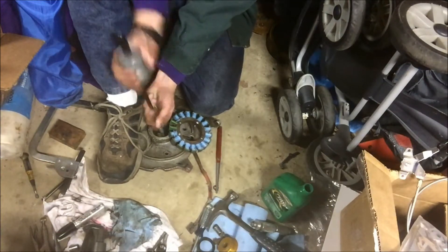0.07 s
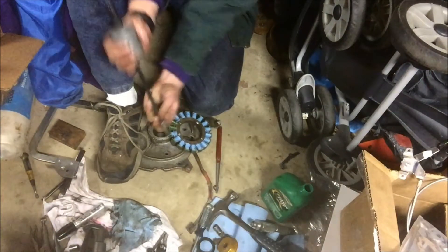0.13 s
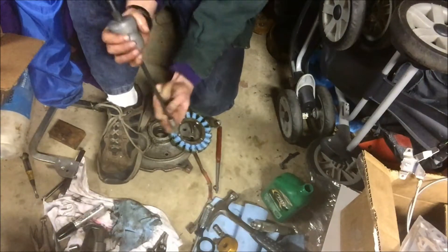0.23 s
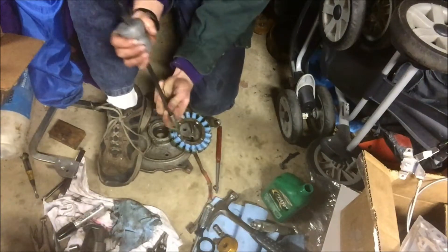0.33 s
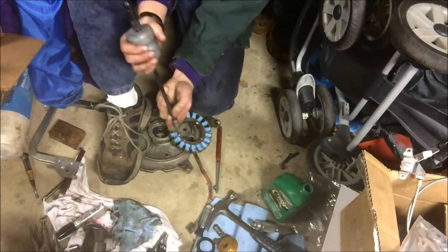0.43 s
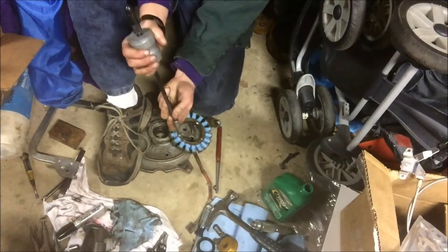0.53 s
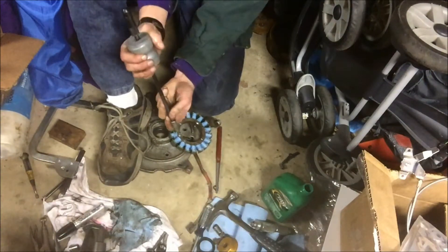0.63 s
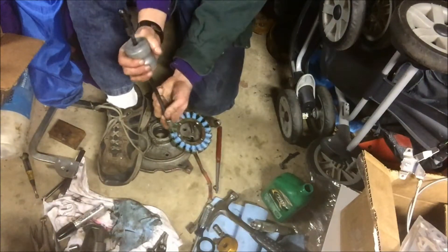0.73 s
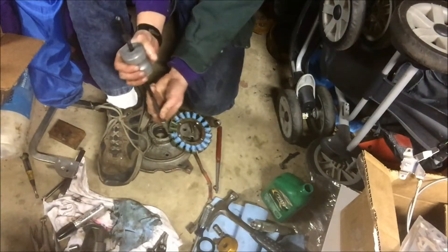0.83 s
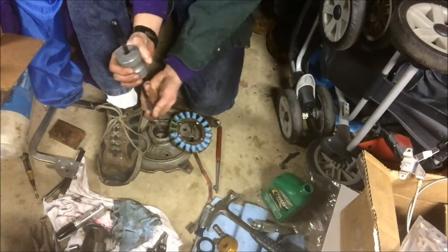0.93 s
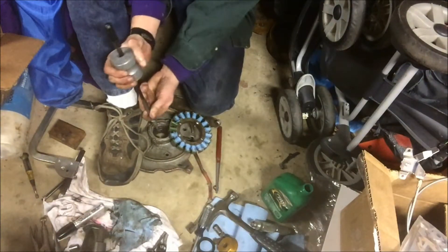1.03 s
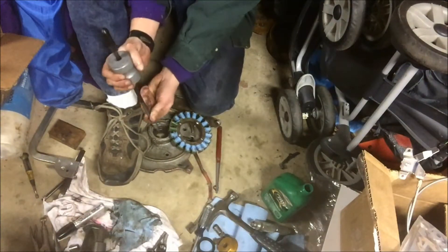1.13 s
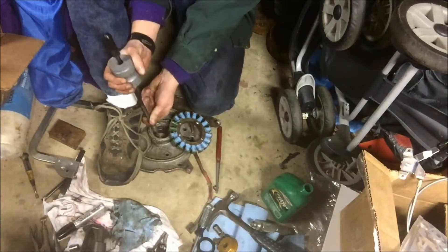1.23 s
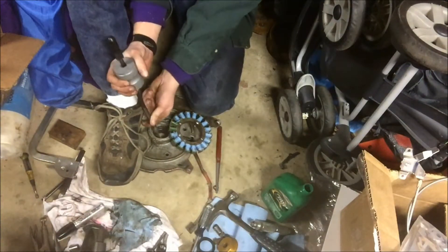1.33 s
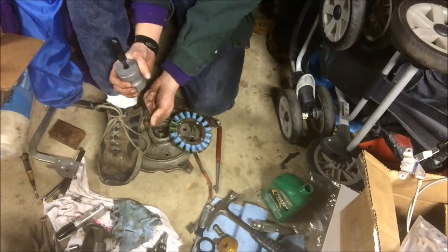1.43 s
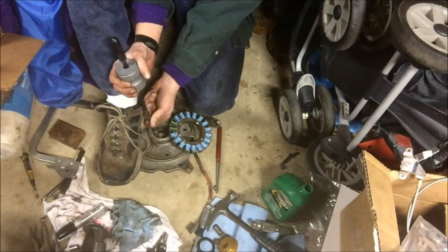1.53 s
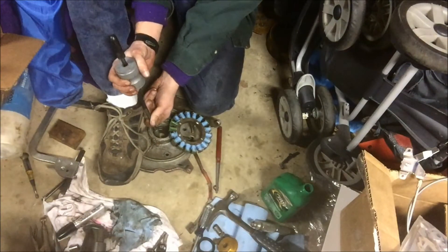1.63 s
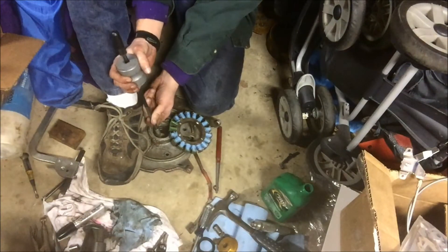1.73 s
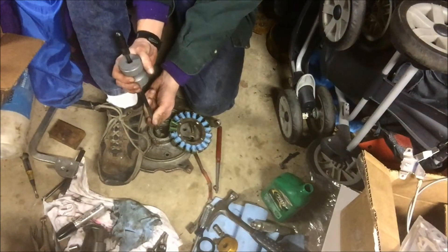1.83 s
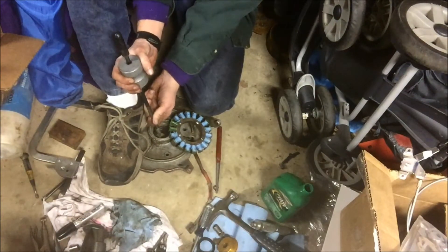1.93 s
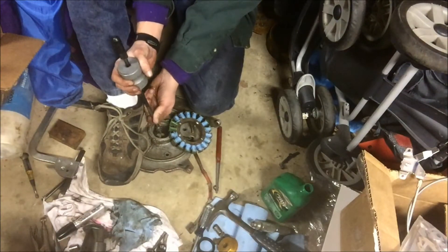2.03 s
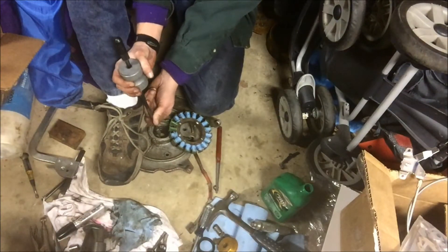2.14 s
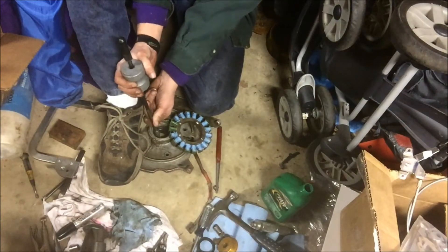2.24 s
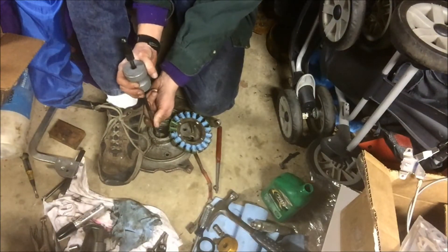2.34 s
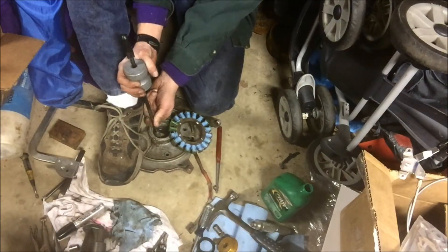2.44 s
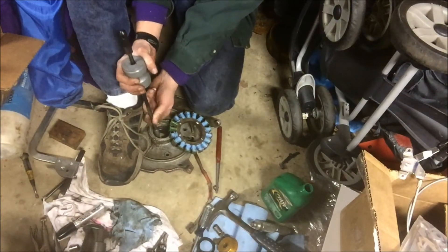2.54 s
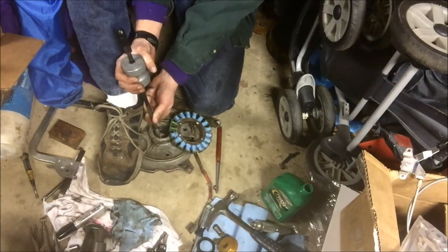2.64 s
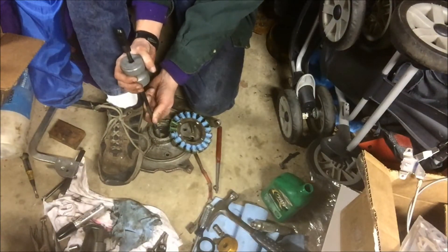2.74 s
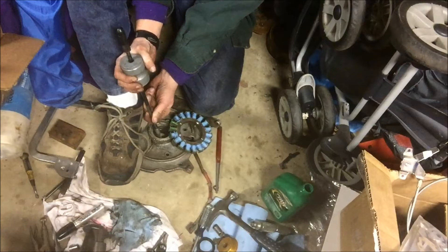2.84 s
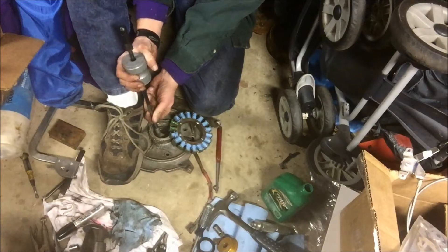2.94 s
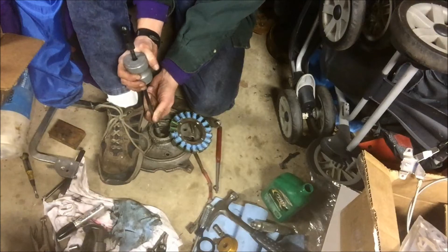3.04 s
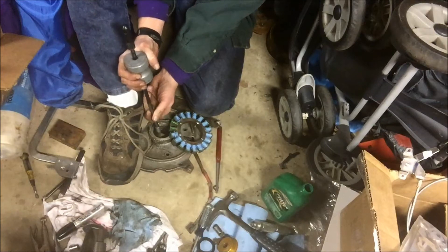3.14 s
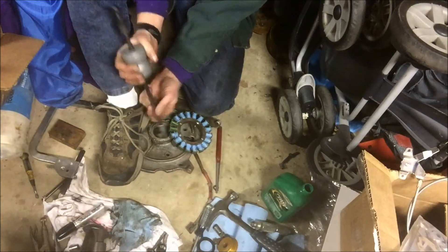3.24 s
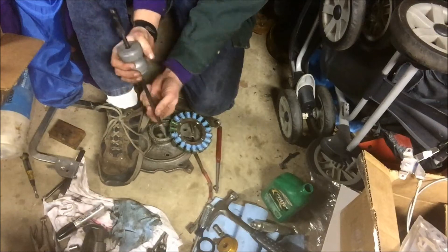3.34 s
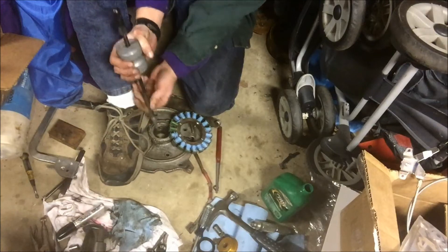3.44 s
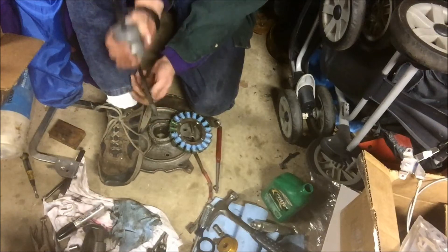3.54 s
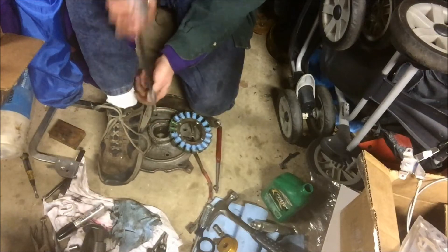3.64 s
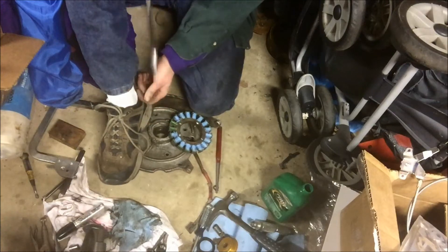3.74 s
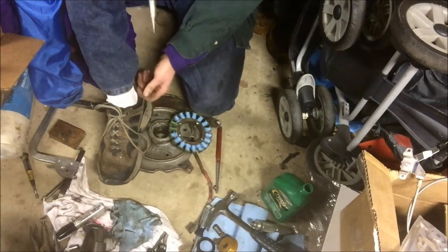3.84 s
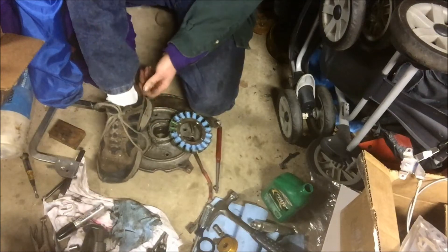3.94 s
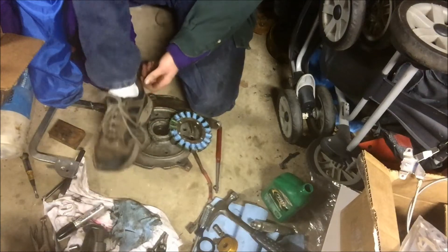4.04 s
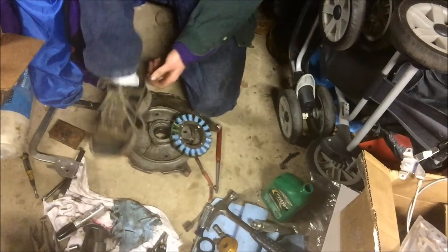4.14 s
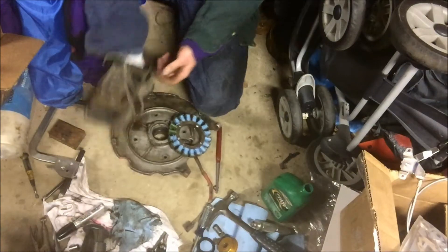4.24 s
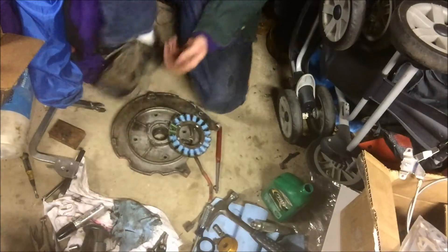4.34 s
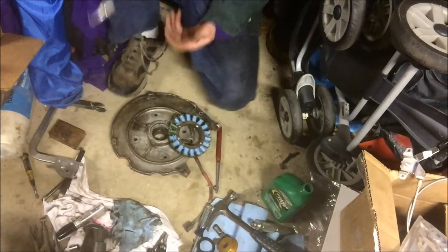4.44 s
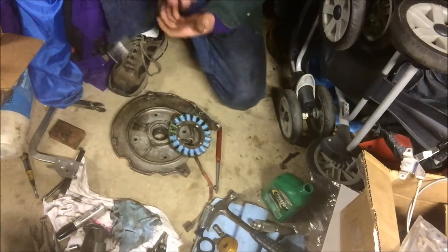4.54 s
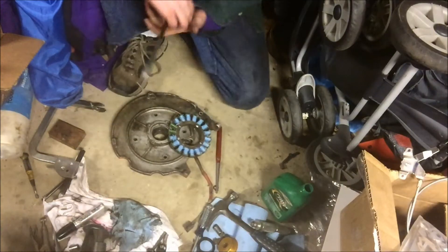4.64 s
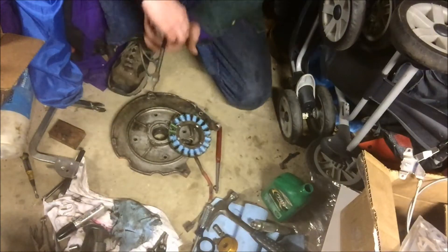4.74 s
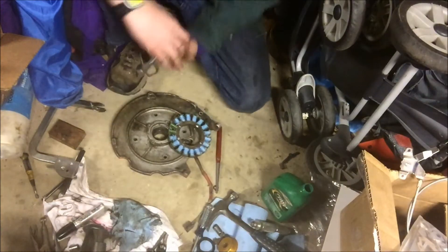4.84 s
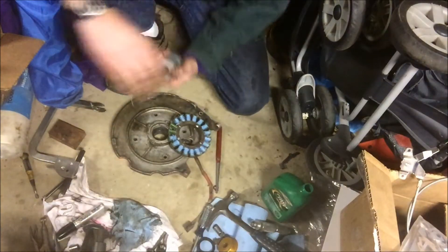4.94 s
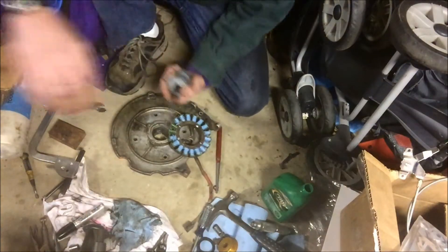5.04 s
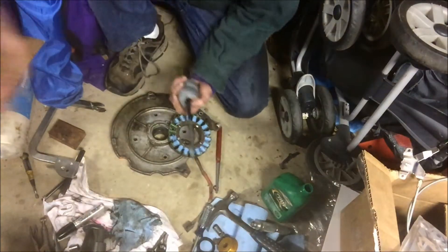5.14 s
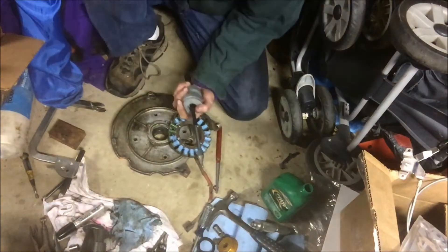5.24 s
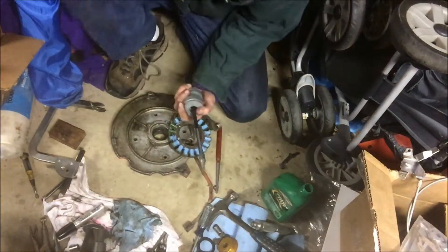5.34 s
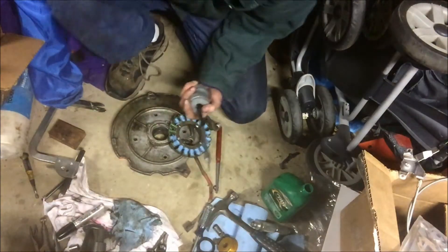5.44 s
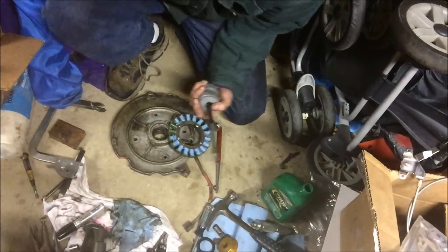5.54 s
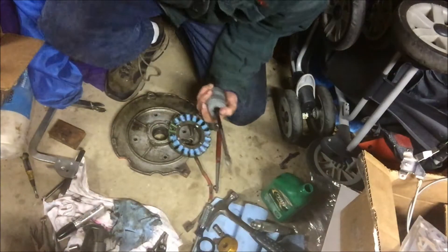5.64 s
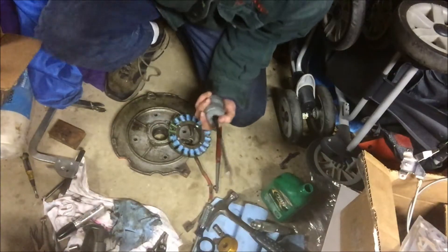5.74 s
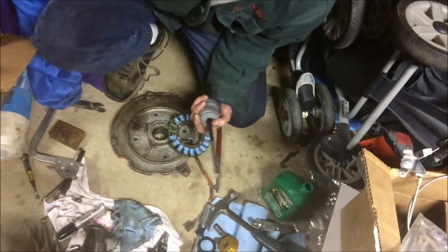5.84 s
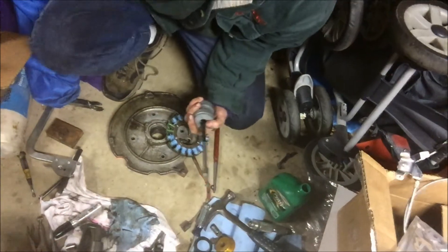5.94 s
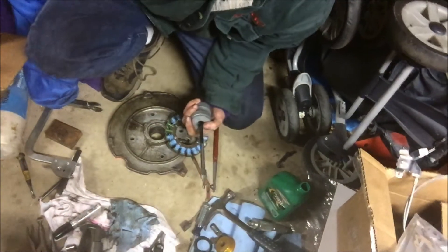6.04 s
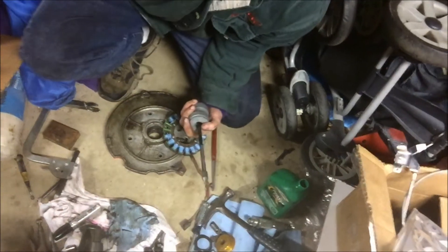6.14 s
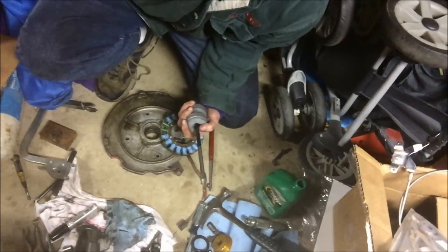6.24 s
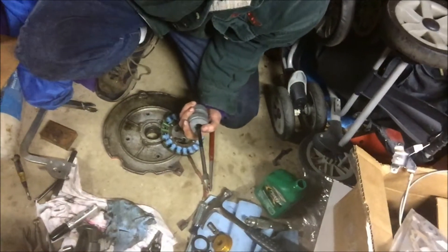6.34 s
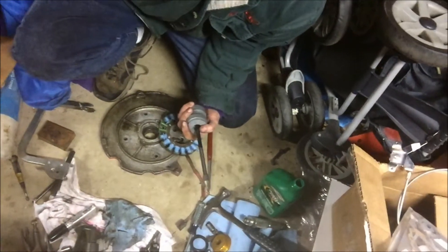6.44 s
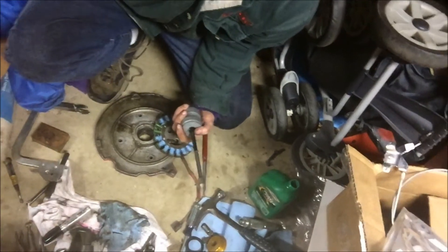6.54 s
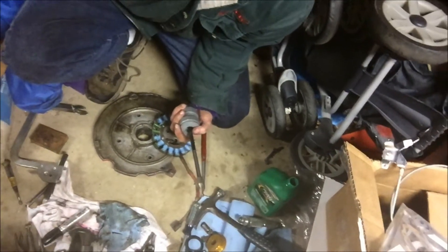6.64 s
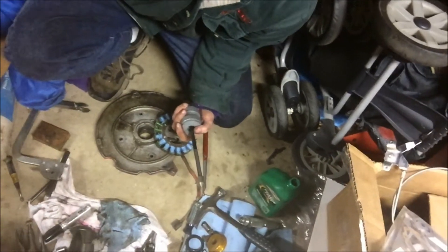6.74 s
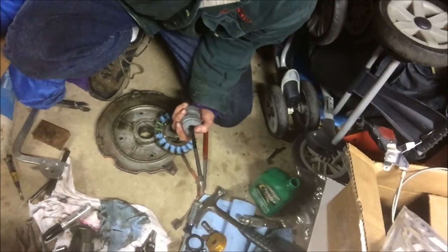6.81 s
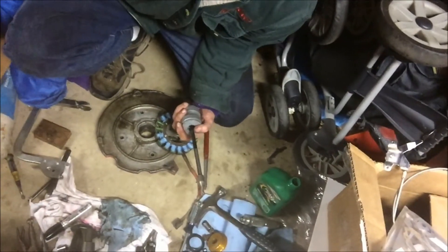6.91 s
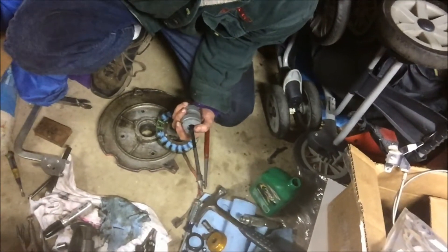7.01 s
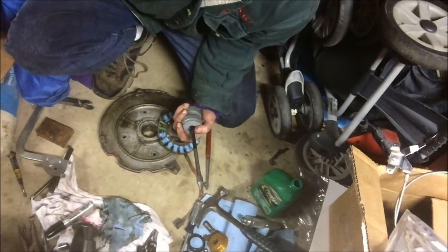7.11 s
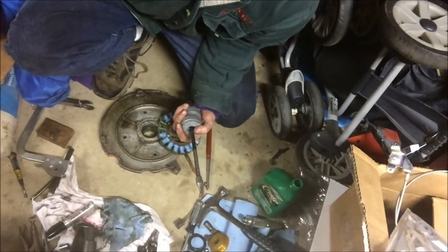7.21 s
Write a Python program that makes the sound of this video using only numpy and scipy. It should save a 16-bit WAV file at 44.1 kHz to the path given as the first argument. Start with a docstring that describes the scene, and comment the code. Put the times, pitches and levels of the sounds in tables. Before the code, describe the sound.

A steel puller tool bangs hard twice with quiet metal ticks between, a cast cover clatters to the floor, a rod clinks, and boots scuff and thump.

```python
"""A slide hammer in a garage: its weight strikes along the steel rod while the hook knocks and grates in the seal.
The tool is noisy cracks over dying modes of hook, tip and rod; the cast engine cover rings lower on the concrete.
Grating is random slips through the hook's modes. Boots and knees tick and thump; soles and cloth are grainy noise.
Below lie room tone and a faint mains hum. A diffuse garage tail follows the near sounds, all in mono."""
import sys
import numpy as np
from scipy import signal
from scipy.fft import rfft, irfft, next_fast_len
from scipy.io import wavfile
from scipy.ndimage import map_coordinates

SR = 44100
rng = np.random.default_rng(int(sys.argv[2]) if len(sys.argv) > 2 else 0)


def wrap_up_sound(samples):
    """Save the sound to the file named by the first command line argument, as 16-bit audio."""
    columns = np.atleast_2d(samples).T
    # keep every value between -1 and 1, then stretch to whole-number steps
    tamed = np.clip(columns, -1, 1)
    steps = np.round(tamed * 32767).astype(np.int16)
    wavfile.write(sys.argv[1], SR, steps)


N = 320651
T = np.arange(SR // 3) / SR  # time since a contact (s)

# Levels in the tables are balances between events or modes; the sources trim each layer further.
# Contacts of the hooked tool: [t/s, crack level/dB, crack colour f/Hz, hook ring level/dB, loudest hook f/Hz]
TOOL_CONTACTS = [(.1865, -28, 3330, -30, 1110), (.197, -16, 2430, -20, 1240), (.2189, 7.5, 3100, -3, 915),
                 (.2424, -4.5, 3230, -18, 1370), (.2884, -34, 3040, -22, 538), (.392, -25, 7017, -41, 2410),
                 (.398, -23.5, 2982, -47, 972), (.5322, -35, 3030, -55, 1894),
                 (1.8215, -26, 5230, -25, 1322), (1.8374, -26, 2700, -21, 1025),
                 (1.841, -45, 2500, -31, 520), (1.8524, -38.5, 2540, -21.5, 1030),
                 (2.0105, -45.5, 3300, -32, 560), (2.013, -50, 3300, -35, 1400),
                 (2.0654, -50.5, 2150, -67, 561), (2.4544, -56, 3300, -62.5, 602),
                 (2.5077, -38, 5000, -57.5, 1360), (2.5576, -51, 4150, -57.5, 1355),
                 (2.5792, -57.5, 5660, -57.5, 1247), (2.6755, -44, 3900, -31, 1067),
                 (2.6923, -37.5, 3920, -42, 1060), (2.9894, -57, 4090, -50, 1690),
                 (3.0364, -53, 6300, -52, 1673), (3.0664, -47.5, 4070, -38, 1690),
                 (3.0824, -54, 4080, -56, 1690), (3.3308, -7.5, 5760, -18.5, 1690),
                 (3.3403, -2, 3230, -18, 1707), (3.5515, -45.5, 4610, -52, 2450),
                 (3.5857, -44, 2330, -55, 2284), (3.8531, -54, 2585, -42, 1050),
                 (5.3368, -48.5, 2000, -32, 1430), (5.3464, -53.5, 2230, -31, 1400),
                 (5.3644, -40.5, 2184, -49, 1480), (5.3794, -47, 2110, -44, 1473),
                 (5.4194, -60.5, 2020, -40.5, 1430)]
# Modes of tool and cover coupled by the hook: [f/Hz, level/dB, t60/s before the grip factor]
HOOK_MODES = [(460, -6, .06), (535, 0, .11), (670, -2, .08), (800, -6, .06), (968, -1, .1), (1036, 0, .14),
              (1325, -1, .09), (1400, -2, .1), (1490, -4, .08), (1710, -2, .15), (2100, -5, .07),
              (2250, -4, .07), (2470, -4, .12)]
# Modes of the short bent tip: [f/Hz, level/dB, t60/s before the grip factor]
TIP_MODES = [(3075, -12, .1), (3230, 0, .16), (3375, -5, .12), (3920, -10, .1)]
# Modes of the steel rod and weight: [f/Hz, level/dB, t60/s before the grip factor]
ROD_MODES = [(2342, -9, .17), (3117, -5, .17), (4743, -4, .16), (5830, -16, .12), (6336, -14, .15),
             (6681, -14, .17), (6864, -8, .2), (6977, -4, .19), (7273, -12, .14), (8603, -9, .14),
             (9189, 0, .14), (9277, -3, .14), (9400, -8, .13), (10260, -20, .12), (11410, -6, .15),
             (11460, -3, .13), (11850, -4, .14), (12600, -18, .1), (14640, -1, .12), (14950, -10, .11)]
# The weight clinks on the free rod: [t/s, ring level/dB, loudest f/Hz, spread/octaves, grip/decay factor]
ROD_CLINKS = [(3.554, -39, 4700, .68, .32), (3.638, -54, 6880, .67, .7), (3.646, -47.5, 5970, .46, .8),
              (3.657, -51, 5456, .47, .55), (4.341, -50, 6880, .25, .5), (4.4235, -30.5, 7936, 1.9, .8),
              (4.9198, -15, 8000, 1.65, 1.05), (4.934, -18, 6500, 1.2, 1.2), (4.965, -31, 4000, 1.1, .7),
              (4.995, -32, 3700, 1.1, .7)]
# The cover meets the floor: [t/s, ring level/dB, loudest f/Hz]
COVER_DROPS = [(4.217, -35.5, 907), (4.237, -22.5, 850), (4.251, 2.5, 1500), (4.257, 4, 929),
               (4.27, -11, 974), (4.284, -27.5, 1156), (4.368, -3, 1200), (4.381, -5, 1300),
               (4.399, -21, 1640)]
# Modes of the cast cover: [f/Hz, level/dB, t60/s before the grip factor]
COVER_MODES = [(380, -16, 0.07), (520, -16, .07), (666.6, -13, 0.096), (886, -3, .2), (955.6, -3.5, 0.083),
               (1152, -3.5, 0.061), (1249.5, 0, 0.17), (1478, -13, 0.2), (1640, -7.5, .28),
               (2020, -19.5, 0.24), (2238, -14, 0.12), (2520, -19, .08), (2808, -18, 0.1), (3050, -19, .1),
               (3385, -13.5, .18), (4060, -23.5, 0.24), (4853, -32.5, .08), (5700, -28, 0.15)]
# Metal rubs metal: [peak t/s, 30 dB swell/s, 30 dB fade/s, grate level/dB, hiss level/dB, grate f/Hz]
METAL_SLIDES = [(.18, .036, .05, -41, -52, 700), (.192, .03, .04, -43, -36, 1340),
                (.217, .05, .006, -36, -31, 990), (.44, .04, .11, -55, -55, 1150),
                (1.836, .03, .04, -34, -30, 1150), (2.56, .05, .05, -60, -63, 1290),
                (2.689, .026, .035, -42, -45, 1060), (2.99, .025, .05, -62, -68, 1600),
                (3.072, .05, .05, -63, -68, 1600), (3.333, .025, .006, -42, -43, 1250),
                (3.549, .025, .05, -56, -53, 2280), (3.59, .04, .04, -58.5, -70, 2285),
                (3.656, .04, .06, -47.5, -47.5, 2340), (3.802, .07, .07, -59, -73, 1008),
                (3.922, .09, .06, -55, -68, 1050), (3.952, .06, .04, -50.5, -70, 1420),
                (4.92, .022, .006, -52, -41, 1850), (5.35, .035, .07, -38, -59.5, 1450),
                (5.41, .08, .06, -48, -68, 1450)]
# Bumps of boot and knee:
# [t/s, tick level/dB, tick f/Hz, thump level/dB, thump f/Hz, jolt level/dB, scuff level/dB]
BODY_BUMPS = [(4.569, -21, 900, -35, 150, -54.5, -58), (4.751, -32, 1560, -66, 398, -85, -56),
              (4.791, -32, 1594, -72, 377, -85, -66), (5.131, -51.5, 1480, -58, 146, -74, -62),
              (5.212, -39, 902, -58, 304, -80, -53), (5.338, -34, 1430, -52.5, 243, -75, -58),
              (5.39, -60, 900, -66, 350, -85, -53), (5.459, -47, 1390, -62, 407, -82, -66),
              (5.62, -46.5, 961, -59.5, 330, -76, -56), (5.915, -54.5, 918, -55.5, 110, -67.5, -57),
              (6.044, -48.5, 1532, -45, 155, -61, -62), (6.133, -42, 999, -65.5, 367, -81, -65),
              (6.175, -44, 3004, -55, 294, -85, -60), (6.379, -59, 991, -57.5, 331, -86, -65),
              (6.617, -38, 1600, -44, 175, -49, -64), (6.739, -57, 1065, -63, 91, -72, -80),
              (6.918, -32, 1000, -41, 240, -73, -57), (6.947, -56.5, 982, -43.5, 190, -66, -66),
              (7.051, -46, 450, -49, 240, -80, -65)]
# Restless boots and cloth: [t/s, scuff level/dB, rustle level/dB]
SHUFFLE_LEVELS = [(.8, -88, -85), (1, -80.5, -69), (1.13, -84, -83), (1.45, -86, -77), (1.8, -88, -85),
                  (3.35, -88, -85), (3.7, -72.5, -61), (3.8, -72, -69), (3.93, -74.5, -64),
                  (4.02, -80, -72), (4.25, -60, -58), (4.66, -57, -63), (4.685, -63, -52), (4.76, -60, -49),
                  (4.86, -65, -58), (4.9, -71, -62), (5.05, -69, -55), (5.15, -67, -68), (5.34, -66, -57),
                  (5.45, -66, -63), (5.67, -66, -62), (5.8, -75, -72), (5.93, -64, -67), (6.2, -66, -69),
                  (6.35, -80, -81), (7.28, -84, -89)]
# Spectrum of grit under metal: [f/Hz, relative level/dB per Hz]
GRIT_SPECTRUM = [(880, -37), (1500, -10), (2660, -5.5), (3280, -6.5), (4080, -5.5), (7100, -16),
                 (16000, -41)]
# Spectrum of dragging soles: [f/Hz, relative level/dB per Hz]
SCUFF_SPECTRUM = [(47, -38.5), (80, -7.5), (455, 0), (520, -1), (904, -5.5), (2000, -24), (2600, -50),
                  (4400, -120)]
# Spectrum of moving cloth: [f/Hz, relative level/dB per Hz]
RUSTLE_SPECTRUM = [(470, -35), (800, -11), (965, -3.5), (1550, -3), (1900, -5.5), (6170, -11),
                   (16000, -30.5)]
# Spectrum of the room tone: [f/Hz, relative level/dB per Hz]
AIR_SPECTRUM = [(12, -53), (20, -21.5), (75, -1.5), (114, -11.5), (211, -6.5), (243, -4.5), (437, -14),
                (476, -8.5), (745, -12.5), (1680, -15.5), (1830, -14.5), (12600, -27.5), (16300, -29)]
# Mains hum partials: [f/Hz, rms level/dB before the slow wobble]
HUM_PARTIALS = [(120, -89), (240, -83.5), (480, -89)]
# Decay of the garage: [f/Hz, t60/s]
GARAGE_DECAY = [(100, .55), (500, .33), (2000, .32), (6000, .31), (14000, .26)]

# Hard blows shake the tool loose: decay factor and free ringing (s) at 0 dB, and their loss per dB softer
GRIP, GRIP_PER_DB, FREE_S, FREE_S_PER_DB = .62, .0042, .035, .00035
# Width in octaves of the modes woken; hard blows wake more of the hook's
HOOK_SPREAD, SPREAD_PER_DB, TIP_SPREAD = .5, .004, .16
# The tip, set under the mean of crack and hook, answers best to cracks of its own colour, up to a limit
TIP_DB, TIP_TOP_DB, TIP_HZ, TIP_DB_PER_OCTAVE = -6, -9, 3500, 14
ROD_DB, ROD_LOW_HZ = -23, 4800  # level relative to the crack; lowest centre of the woken modes
CLINK_FREE_S, CLINK_CRACK_DB = .02, -2  # the crack is relative to the ring
DROP_FREE_S, DROP_CRACK_DB, DROP_CRACK_GROWS = .018, -20, .55  # the crack gains this share of each dB of ring
# Each bump drags the sole a little late and, more softly, folds cloth
THUMP_T60_S, SCUFF_LATE_S, SCUFF_SWELL_S, SCUFF_FADE_S, FOLD_DB = .08, .012, .055, .09, -15
AIR_DB, TOP_HZ = -70, 16400  # room tone rms; band limit


def tool():
    """Each contact cracks and rings rod and tip and, through the hook, the lower coupled modes."""
    out = np.zeros(N + SR)
    for s, crack_db, crack_hz, hook_db, hook_hz in TOOL_CONTACTS:
        grip = GRIP + GRIP_PER_DB * crack_db
        free = FREE_S + FREE_S_PER_DB * crack_db
        hook_spread = HOOK_SPREAD + SPREAD_PER_DB * crack_db
        tip_db = min((crack_db + hook_db) / 2 + TIP_DB, TIP_TOP_DB)
        tip_db -= TIP_DB_PER_OCTAVE * abs(np.log2(crack_hz / TIP_HZ))
        rod_hz = max(crack_hz, ROD_LOW_HZ)

        snap = amp(crack_db) * crack(crack_hz, 0.027 * grip, q=0.58)
        clatter = amp(crack_db - 7.5) * crack(crack_hz, 0.087 * grip, q=0.3)
        hook = ring(HOOK_MODES, grip, free, hook_hz, hook_spread, rattle_db=2.2, caught_db=6)
        tip = ring(TIP_MODES, grip, free, crack_hz, TIP_SPREAD, rattle_db=1.5, caught_db=3)
        rod = ring(ROD_MODES, grip, free, rod_hz, spread=.9, rattle_db=3.0, caught_db=7.5)
        shake = amp(hook_db - 16) * crack(110, 0.29, q=0.28)  # the pull shakes the whole casting
        rings = amp(hook_db + 2.5) * hook + amp(tip_db) * tip + amp(crack_db + ROD_DB) * rod
        add(out, s, snap + clatter + rings + shake)
    return out[:N]


def clinks():
    """Off the seal the rod rings high and clear over a thin crack."""
    out = np.zeros(N + SR)
    for s, ring_db, hz, spread, grip in ROD_CLINKS:
        bell = ring(ROD_MODES, grip, CLINK_FREE_S, hz, spread, rattle_db=4.5, caught_db=7)
        thin_crack = amp(CLINK_CRACK_DB) * crack(.6 * hz, 0.083 * grip, q=.35)
        add(out, s, amp(ring_db) * (bell + thin_crack))
    return out[:N]


def cover():
    """The casting rocks back onto the concrete: low ringing modes, a noisy crack and a deeper bump."""
    out = np.zeros(N + SR)
    for s, ring_db, hz in COVER_DROPS:
        bell = ring(COVER_MODES, 0.99, DROP_FREE_S, hz, spread=0.98, rattle_db=1.73, caught_db=9)
        impact = amp(DROP_CRACK_DB + DROP_CRACK_GROWS * ring_db) * crack(2300, .05, q=1.1)
        bump = amp(ring_db - 13) * crack(330, 0.1, q=0.4)
        add(out, s, amp(ring_db - 4) * bell + impact + bump)
    return out[:N]


def slides():
    """Grit under moving steel: slips that grate in the hook's modes, and a bright hiss."""
    def hook_response(hz):
        return sum(amp(db) * band(hz, centre_hz, 5.5) for centre_hz, db, _ in HOOK_MODES)

    slips = rng.standard_normal(N) * amp(5.9 * wobble(250))
    pitches = np.geomspace(600, 2500, num=6)
    tones = [unit(filtered(slips, lambda hz: hook_response(hz) * band(hz, pitch, 4.9) ** 2)) for pitch in pitches]
    bright = hiss(GRIT_SPECTRUM, grain_db=4.5, rate=550)
    out = np.zeros(N)
    for s, swell, fade, grate_db, hiss_db, hz in METAL_SLIDES:
        # crossfade the two tones nearest the grate's pitch
        place = np.interp(np.log(hz), np.log(pitches), np.arange(len(pitches)))
        grate = sum(np.clip(1 - abs(place - k), 0, 1) ** .5 * tone for k, tone in enumerate(tones))
        out += stroke(s, swell, fade) * (amp(grate_db) * grate + amp(hiss_db) * bright)
    return out


def thuds():
    """A dull tick over a soft thump, with a slow jolt through the floor, its level set separately for each bump."""
    out = np.zeros(N + SR)
    soft = 1 - np.exp(-T / 0.0027)  # rubber and cloth give before they push
    for s, tick_db, tick_hz, thump_db, hz, jolt_db, _ in BODY_BUMPS:
        body = np.sin(2 * np.pi * hz * T) + 2.2 * crack(1.5 * hz, THUMP_T60_S, q=.9)
        push = body * amp(thump_db + 6 - 60 * T / THUMP_T60_S)
        thump = filtered(soft * push, lambda f: band(f, hz, 0.49))
        jolt = soft * np.sin(2 * np.pi * 50 * T) * amp(jolt_db + 9.5 - 60 * T / .12)
        add(out, s - .002, thump + jolt)
        add(out, s, amp(tick_db + 1.5) * crack(tick_hz, .04, q=.75))
    return out[:N]


def shuffle():
    """Soles and cloth drag over the dusty floor, in a continuous bed and a short scuff with every bump."""
    scuff = hiss(SCUFF_SPECTRUM, grain_db=1.5, rate=32)
    rustle = hiss(RUSTLE_SPECTRUM, grain_db=2.0, rate=200)
    scuff_db, rustle_db = curves(SHUFFLE_LEVELS)
    drags = sum(amp(row[-1]) * stroke(row[0] + SCUFF_LATE_S, SCUFF_SWELL_S, SCUFF_FADE_S) for row in BODY_BUMPS)
    scuff_gain = np.hypot(amp(scuff_db), drags)
    rustle_gain = np.hypot(amp(rustle_db), amp(FOLD_DB) * drags)
    return scuff_gain * scuff + rustle_gain * rustle


def air():
    """Room tone as coloured noise, and mains hum as sines whose levels drift slightly."""
    t = np.arange(N) / SR
    hum = sum(np.sqrt(2) * amp(db + 1.5 * wobble(1.3)) * np.sin(2 * np.pi * hz * t) for hz, db in HUM_PARTIALS)
    return amp(AIR_DB) * hiss(AIR_SPECTRUM, grain_db=1.5, rate=1) + hum


def garage(x):
    """Diffuse noise tails, each frequency dying at its own speed; a fresh tail every quarter second."""
    wet, step = np.zeros(N + 2 * SR), SR // 4
    for start in range(0, N, step):
        hz, t, z = signal.stft(rng.standard_normal(SR // 2), SR, nperseg=256)
        decay = amp(-60 * t / along(GARAGE_DECAY, hz)[:, None])
        tail = signal.istft(z * decay, SR, nperseg=256)[1]
        echo = signal.fftconvolve(x[start:start + step], tail / np.linalg.norm(tail))
        add(wet, start / SR + 0.0033, echo)
    return wet[:N]


def ring(modes, grip, free, centre_hz, spread, rattle_db, caught_db):
    """Dying modes, weaker far from centre_hz; loose parts make each flutter, and after free s they are damped."""
    hz, db, t60 = np.array(modes).T[:, :, None]
    far_db = np.minimum(6 * (np.log2(hz / centre_hz) / spread) ** 2, 17)
    size = amp(db - far_db + 2 * rng.standard_normal(hz.shape))
    knots = rng.standard_normal((len(hz), 60))
    flutter = np.array([np.interp(T, np.linspace(0, T[-1], len(row)), row) for row in knots])
    level = size * amp(rattle_db * flutter - 60 * T / (grip * t60))
    partials = level * np.sin(2 * np.pi * hz * T + 0.05 * rattle_db * flutter)
    caught = amp(-caught_db * np.clip((T - free) / .004, 0, 1))
    return partials.sum(0) * caught * onset() / np.linalg.norm(size)


def crack(centre_hz, t60, q):
    """The noisy burst of two surfaces meeting; the contact time rounds off its top."""
    burst = amp(-60 * T / t60) * onset() * rng.standard_normal(len(T))
    return filtered(burst, lambda hz: band(hz, centre_hz, q) ** 2 / (1 + 1j * hz / (3.5 * centre_hz)))


def onset():
    """The contact force builds up."""
    return 1 - np.exp(-(T / 0.0012) ** 2)


def stroke(s, swell, fade):
    """Gain that swells to 1 at s and fades, 30 dB in the given times, ever steeper towards both ends."""
    t = np.arange(N) / SR - s
    return amp(-30 * np.maximum(-t / swell, t / fade) ** 1.5)


def hiss(spectrum, grain_db, rate):
    """Coloured noise of rms 1, broken into grains by a random level."""
    grains = rng.standard_normal(N) * amp(grain_db * wobble(rate))
    return unit(filtered(grains, lambda hz: amp(along(spectrum, hz))))


def band(hz, centre_hz, q):
    """Causal response of one resonance."""
    return 1j * hz * centre_hz / q / (centre_hz ** 2 - hz ** 2 + 1j * hz * centre_hz / q)


def filtered(x, response):
    """x shaped by a response of frequency."""
    m = next_fast_len(len(x) + 8192)
    return irfft(rfft(x, m) * response(np.fft.rfftfreq(m, 1 / SR)), m)[:len(x)]


def wobble(rate):
    """A smooth random curve, rate knots a second."""
    knots = rng.standard_normal(int(N * rate / SR) + 4)
    return map_coordinates(knots, [np.arange(N) * rate / SR])


def curves(rows):
    """One value per sample for each column after the time."""
    s, *cols = np.transpose(rows)
    return [np.interp(np.arange(N) / SR, s, c) for c in cols]


def along(points, hz):
    """Values between (Hz, value) points on a log axis."""
    f, v = np.transpose(points)
    return np.interp(np.log(hz + 1), np.log(f + 1), v)


def amp(db):
    """Decibels to linear gain."""
    return 10 ** (np.asarray(db) / 20)


def unit(x):
    """x scaled to rms 1."""
    return x / np.sqrt(np.mean(x ** 2) + 1e-20)


def add(track, s, sound):
    """Mix a sound into the track at s seconds."""
    track[round(s * SR):][:len(sound)] += sound


def scene():
    """Metal and bumps with their garage tail, over the shuffling and the room tone."""
    metal = tool() + clinks() + cover() + slides()
    metal = filtered(metal, lambda hz: 1j * hz / (330 + 1j * hz))  # the metal sounds carry little bass below about 330 Hz
    near = metal + thuds()
    return (near + amp(-12.5) * garage(near) + shuffle() + air())[None]


def record(dry):
    """The loudest blows clip smoothly; nothing is kept above the band limit."""
    clipped = dry[0] / (1 + abs(dry[0]) ** 8) ** (1 / 8)
    return filtered(clipped, lambda hz: hz < TOP_HZ)[None]


dry = scene()
out = record(dry)
wrap_up_sound(out)
```